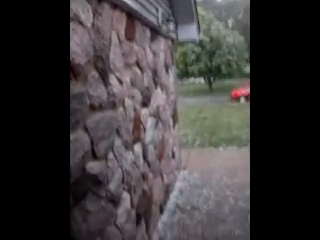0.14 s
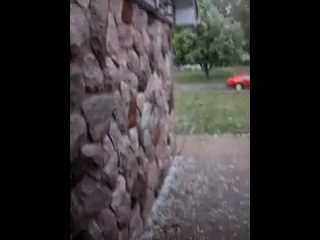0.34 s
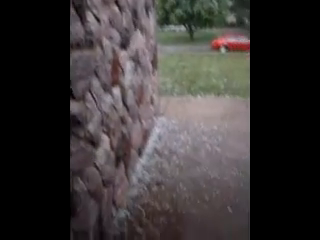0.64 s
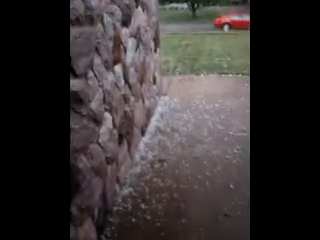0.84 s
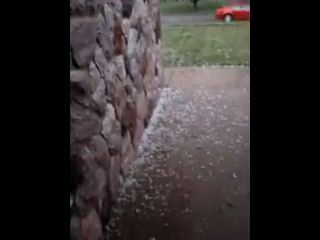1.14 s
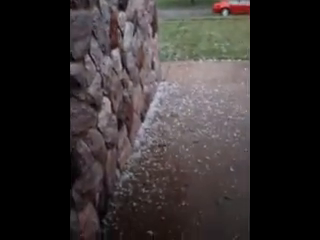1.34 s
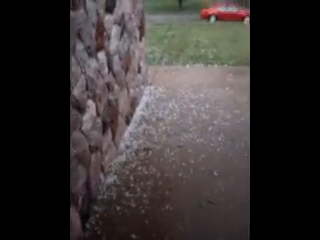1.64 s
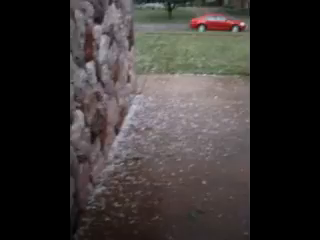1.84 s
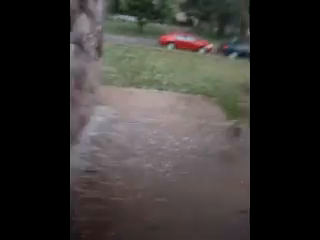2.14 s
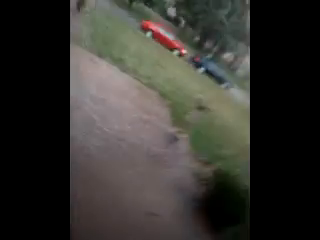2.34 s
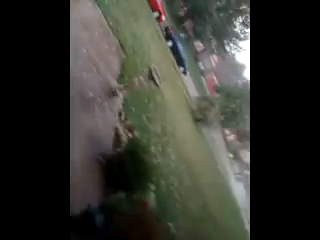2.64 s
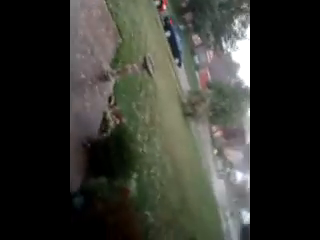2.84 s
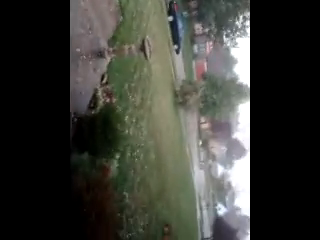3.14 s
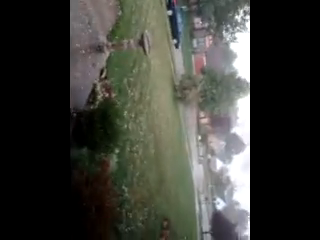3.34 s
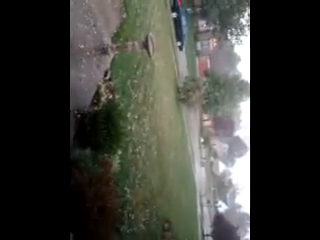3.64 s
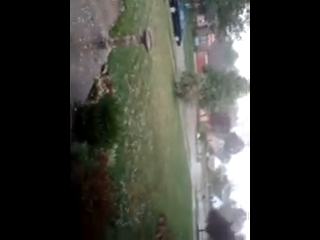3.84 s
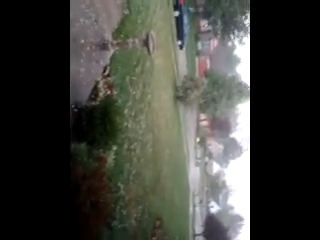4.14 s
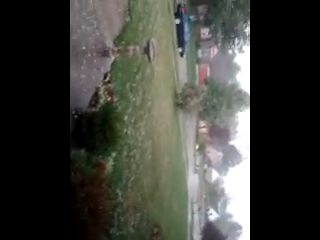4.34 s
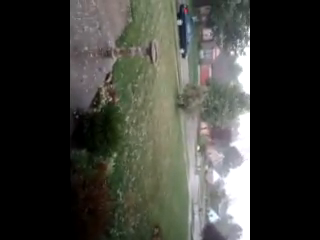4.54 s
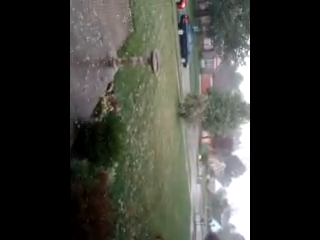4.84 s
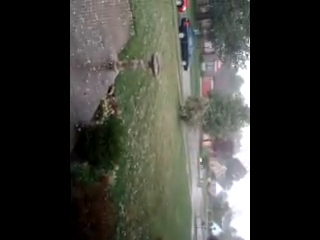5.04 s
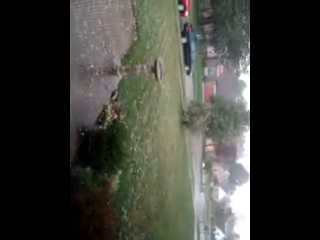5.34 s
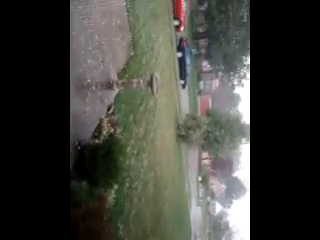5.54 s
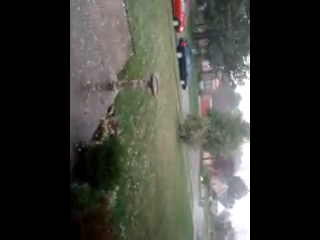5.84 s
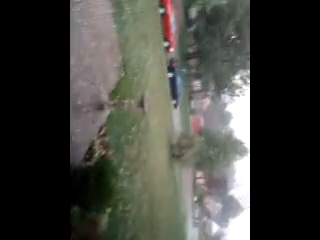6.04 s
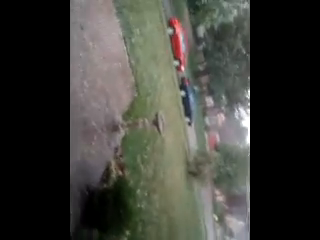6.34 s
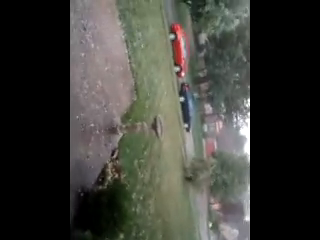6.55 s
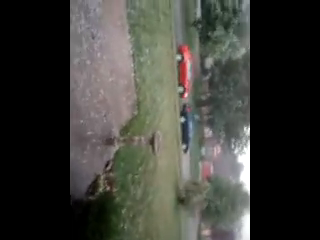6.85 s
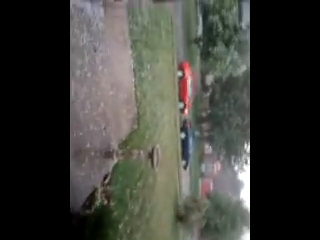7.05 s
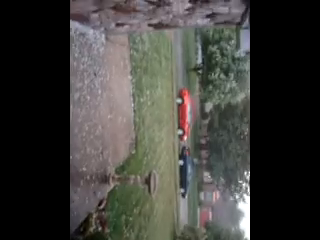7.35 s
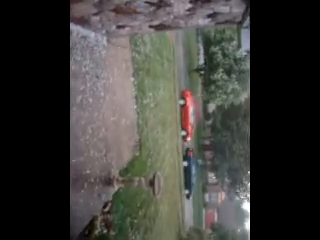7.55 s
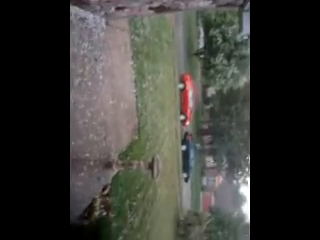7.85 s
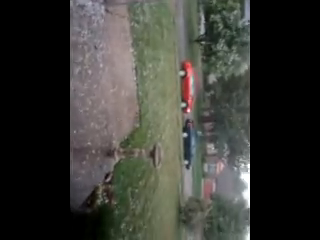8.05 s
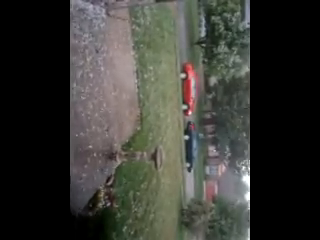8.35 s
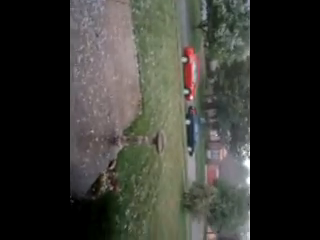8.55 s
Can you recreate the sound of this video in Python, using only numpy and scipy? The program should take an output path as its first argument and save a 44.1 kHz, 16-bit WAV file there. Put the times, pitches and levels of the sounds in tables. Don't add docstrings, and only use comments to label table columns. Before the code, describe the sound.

A hailstorm is already in full fall at 0 seconds and continues unbroken to about 8.7. Countless small stones on the lawn form a grainy patter and hiss, gently swelling and easing. Close to the microphone, large stones hit paving: sharp ticks at 0.2 to 0.5, with cracks and splintery scatter. Around 1.0 to 1.6 come hollow board thuds and brief gutter pings. A soft deep roof boom falls near 2.7, a ping near 2.9, then a cluster of knocks at 3.4 to 3.7. Bright metallic clinks and a strong knock arrive at 5.05 to 5.4, and a heavy woody blow with a roof boom at 5.8. Another thud lands at 6.8; dense cracks and clinks crowd 7.0 to 7.6, then hard hits at 8.0 and 8.5. Short porch reflections surround the blows. The phone sound is thin, band-limited and patchy in the treble.

```python
import sys
import numpy as np
from scipy import signal
from scipy.fft import rfft, irfft
from scipy.io import wavfile
from scipy.ndimage import uniform_filter1d

SR = 44100
rng = np.random.default_rng(int(sys.argv[2]) if len(sys.argv) > 2 else 0)


def int16_out(signal):
    q = np.round(np.clip(np.atleast_2d(signal).T, -1, 1) * 32767)
    wavfile.write(sys.argv[1], SR, q.astype(np.int16))


def volts(x):
    e = np.asarray(x, float) / 20
    return 10 ** e


N = 384111
RING_LEN = 8192
TREBLE_TOP_HZ = 10190

# start_s, level_db, large_stones_db (re level)
STORM = [(0.0, -34, 0.5), (0.72, -39.5, 1), (1.45, -33.5, 1), (2.21, -35, 0.5), (2.86, -35.5, 3.5),
         (3.39, -35, 1.5), (3.62, -33, 2.5), (3.98, -37.5, 3), (4.19, -34, 1), (4.75, -35.5, 6.5),
         (4.9, -32, 3.5), (5.41, -33, 1), (5.82, -36, 1.5), (6.9, -34.5, 1), (7.16, -32.5, 4),
         (7.7, -36.5, -0.5), (8.01, -34.5, 3), (8.71, -32.5, 1)]
# freq_hz, density_db (per Hz)
FAR_COLOUR = [(24, -52), (40, -37.5), (192, -19), (313, -6.5), (367, -7), (570, -1), (970, 1.5), (1730, 0),
              (2500, 1), (7940, -6), (10000, -9.5), (13000, -38), (22000, -120)]
# start_s, peak_db
TICKS = [(0.2305, -11.5), (0.3462, -6.5), (0.4472, -14.8), (0.8727, -10), (0.9599, -13.4), (1.3747, -15.8),
         (1.9137, -16.1), (2.1432, -12.5), (2.451, -15.2), (2.6544, -16), (2.9716, -16), (3.199, -13.4),
         (3.4905, -12.4), (3.5862, -13.5), (4.1292, -15.3), (4.5302, -12.5), (4.7353, -19), (4.9484, -19),
         (5.0649, -8.3), (5.1934, -14.3), (5.2049, -14.3), (5.2541, -12.1), (5.3586, -10.4), (5.7763, -6),
         (6.2218, -11.8), (6.7927, -11), (7.2895, -10), (7.8893, -13.3), (8.0043, -8.3), (8.5279, -9.8),
         (0.078, -21), (0.141, -20), (0.4089, -15.7), (1.2998, -16.6), (1.6444, -17), (1.7807, -12.3),
           (1.8139, -17.2), (1.8743, -18), (2.8393, -13.5), (3.0367, -17), (3.3529, -14.5), (3.6852, -15.6),
           (3.9439, -11.5), (4.4384, -16.5), (4.47, -14.3), (5.1613, -15), (5.7515, -15.7), (5.9543, -18.3),
           (6.0765, -16), (6.0866, -14.7), (6.4427, -16.9), (6.6527, -15), (6.9726, -16), (7.231, -12.5),
           (7.4814, -14.7), (7.8074, -13.9), (8.0124, -14.1), (8.0831, -16.8), (8.246, -12.5),
           (8.4061, -16.3)]
# start_s, peak_db
MORE_TICKS = [(0.4604, -15.8), (0.4725, -17.6), (0.5226, -17.1), (0.8595, -20.0), (1.2882, -18.9),
              (1.4577, -17.8), (1.992, -18.2), (2.0629, -20.2), (2.4272, -19.5), (2.4566, -16.0), (2.4687, -17.4),
              (2.5739, -20.6), (2.9277, -15.7), (3.0313, -19.6), (3.0418, -19.0), (3.4288, -18.4),
              (3.4644, -12.7), (3.5172, -17.1), (3.5777, -17.0), (3.7334, -19.0), (4.4886, -17.9),
              (4.5417, -17.4), (4.8285, -17.8), (4.9737, -19.1), (5.1464, -19.3), (5.3088, -19.2),
              (5.6011, -17.2), (5.6451, -17.6), (5.672, -17.0), (6.0579, -20.4), (6.1574, -20.9), (6.7656, -13.3),
              (6.9709, -15.9), (7.002, -18.7), (7.0397, -18.0), (7.1237, -18.3), (7.141, -17.8), (7.1776, -17.9),
              (7.3575, -18.7), (7.5548, -15.9), (7.5626, -17.5), (8.1294, -20.5), (8.3471, -19.7), (8.431, -17.7),
              (8.5947, -16.4), (0.1092, -19), (0.3544, -17), (1.354, -21), (3.2506, -20), (4.3477, -18),
              (5.6855, -19), (6.5485, -21), (7.0672, -18), (7.1563, -18), (1.568, -16), (1.3855, -13),
              (5.6095, -17), (8.4055, -18), (8.651, -20)]
# start_s, peak_db, ring_hz, scatter_t60_s
SHATTERS = [(0.111, -24, 1810, 0.16), (0.408, -23, 5000, 0.081), (0.6915, -24.5, 2490, 0.33),
            (0.859, -24, 2640, 0.1), (1.241, -27, 2520, 0.21), (1.289, -25.5, 1420, 0.16),
            (1.781, -23, 2420, 0.058), (1.873, -25.5, 2700, 0.12), (1.991, -24.5, 3760, 0.049),
            (2.037, -23.5, 5200, 0.051), (2.47, -19.5, 1500, 0.12), (2.8403, -25.5, 1560, 0.2),
            (3.2925, -22.5, 2000, 0.16), (3.351, -24, 4350, 0.083), (3.895, -20, 2230, 0.29),
            (3.943, -19, 1320, 0.18), (4.469, -23, 5560, 0.14), (4.813, -21, 2140, 0.17),
            (5.669, -28, 2570, 0.23), (6.084, -28, 1480, 0.13), (6.5504, -27, 2250, 0.19),
            (6.968, -21, 4400, 0.16), (7.1227, -20.5, 2520, 0.16), (7.23, -18, 1950, 0.087),
            (7.482, -20, 2000, 0.16), (7.5489, -20.5, 5500, 0.13), (7.7105, -18, 2050, 0.032),
            (7.807, -22, 1410, 0.036), (8.242, -19, 4430, 0.025), (8.427, -18, 2400, 0.034)]
# start_s, peak_db, ring_hz, scatter_t60_s
CHIPS = [(0.2298, -16, 3000, 0.095), (0.445, -18.5, 2930, 0.28), (0.511, -17, 1820, 0.1),
         (0.8725, -21, 2980, 0.12), (1.0227, -29, 3200, 0.1), (1.378, -19.5, 3930, 0.1),
         (1.555, -22, 1690, 0.23), (1.9125, -22.5, 2060, 0.18), (2.1417, -20.5, 1870, 0.11),
         (2.4498, -17, 2480, 0.12), (2.6539, -16.5, 2760, 0.19), (2.9726, -20, 2160, 0.17),
         (3.249, -23.5, 2120, 0.098), (3.463, -16.5, 2100, 0.23), (3.7325, -22.5, 1980, 0.17),
         (4.098, -28, 3080, .16), (4.126, -21.5, 2980, 0.14), (4.6752, -20.5, 2190, 0.34),
         (4.7352, -22, 2600, 0.2), (5.1382, -22, 2600, 0.21), (5.602, -23.5, 2000, 0.51),
         (5.6846, -23, 2260, 0.24), (5.726, -19, 2040, 0.3), (5.7768, -16.5, 2500, 0.21),
         (6.2197, -21.5, 2600, 0.17), (6.363, -23.5, 3980, 0.14), (6.65, -24.5, 2050, 0.34),
         (7.0235, -22.5, 2290, 0.4), (7.861, -20, 2300, 0.15), (8.4835, -20.5, 4400, 0.1)]
# start_s, peak_db, ring_hz, scatter_t60_s
BOUNCES = [(0.35, -19, 1860, 0.23), (0.9366, -23, 2900, 0.078), (0.9532, -24, 2870, 0.34),
           (1.402, -18.5, 1850, 0.12), (1.6432, -25.5, 2090, 0.13), (1.8143, -26, 2670, 0.11),
           (2.9258, -23.5, 1750, 0.18), (3.0336, -20, 1520, 0.1), (3.0844, -21.5, 1890, 0.19),
           (3.197, -26, 1840, 0.15), (3.4896, -17.5, 2020, 0.22), (3.5688, -21.5, 3200, 0.083),
           (3.5848, -18.5, 2110, 0.056), (4.4388, -24.5, 2110, 0.14), (4.5294, -19, 1790, 0.11),
           (4.8863, -21, 2100, 0.093), (5.061, -17.5, 2340, 0.079), (5.2535, -21.5, 2180, 0.28),
           (5.3585, -13, 1026, 0.12), (6.183, -27, 2550, 0.056), (6.764, -23, 1940, 0.18),
           (6.7764, -19, 2060, 0.049), (7.174, -18, 2010, 0.038), (7.204, -18, 2360, 0.066),
           (7.2891, -17, 3360, 0.12), (7.3557, -24, 2200, 0.032), (7.889, -19.5, 2100, 0.14),
           (8.011, -19, 2240, 0.086), (8.1686, -18.5, 1770, 0.2), (8.527, -15, 2400, 0.29)]
# start_s, peak_db, ring_hz, t60_s
NOTES = [(0.231, -25.5, 4650, 0.057), (0.5123, -28.0, 1620, 0.089), (0.8715, -29.1, 1950, 0.06),
         (1.0222, -22, 1080, 0.06), (1.3075, -28, 1660, 0.074), (1.3838, -20, 3950, 0.045),
         (1.4592, -23, 2300, 0.058), (2.1416, -22, 1860, 0.061), (2.423, -28, 4070, 0.1),
         (2.4669, -24, 2430, 0.06), (3.1484, -29, 1860, 0.078), (3.1985, -22, 2060, 0.055),
         (3.4626, -27, 2720, 0.072), (3.4946, -26, 4760, 0.12), (3.4896, -27, 2700, 0.132),
         (3.9146, -28, 2020, 0.12), (4.4354, -30.4, 2430, 0.096), (4.4953, -25, 1180, 0.1),
         (4.8186, -28, 1910, 0.216), (4.8875, -17, 3950, 0.025), (4.8885, -19.5, 2072, 0.13),
         (5.0241, -29, 1420, 0.071), (5.06, -22, 710, 0.06), (5.3503, -27, 1417, 0.091),
         (5.3633, -26.5, 1860, 0.108), (5.5988, -24, 2280, 0.14), (5.61, -26, 2780, 0.054),
         (5.6686, -27, 2550, 0.061), (5.7524, -25, 2660, 0.064), (5.7564, -22.1, 1400, 0.057),
         (5.7744, -24, 2400, 0.14), (5.79, -18, 1074, 0.07), (6.0767, -26, 2540, 0.096),
         (6.0877, -28, 1010, 0.12), (6.2212, -16.5, 2410, 0.037), (6.4508, -29, 1450, 0.072),
         (6.7651, -15, 1095, 0.077), (6.7881, -21, 2110, 0.05), (6.8559, -24, 2450, 0.076),
         (7.0275, -25, 2780, 0.11), (7.0694, -29, 1205, 0.12), (7.2291, -18.5, 810, 0.074),
         (7.251, -29, 914, 0.15), (7.2909, -11, 3690, 0.057), (7.3548, -26, 2290, 0.06),
         (7.5533, -22, 2925, 0.064), (7.9764, -28, 880, 0.11), (8.022, -22, 1100, 0.04),
         (8.5261, -16.5, 2640, 0.052), (8.5361, -23.9, 1440, 0.065),
         (.231, -31, 2320, 0.06), (0.458, -21, 2750, 0.055), (.8725, -24.5, 2980, .05),
          (.956, -22, 2940, .05), (1.022, -23, 622, 0.14), (1.404, -41.5, 200, 0.51),
          (1.578, -25, 1920, 0.07), (2.845, -30.5, 1044, 0.2), (2.9282, -21, 1750, 0.061),
          (3.085, -31, 3620, 0.036), (5.803, -16, 567, 0.035), (5.9, -28, 1340, 0.078),
          (6.971, -21, 1188, 0.12), (7.068, -38, 804, 0.17), (7.289, -23, 5360, 0.057),
          (7.806, -23, 950, 0.033), (8.011, -20, 4360, 0.056), (.522, -22, 1100, 0.044),
          (4.476, -23, 1092, .1), (6.09, -22.5, 1190, .06)]
# start_s, peak_db, ring_hz
NARROW_BOARDS = [(0.515, -22, 1144), (0.69, -26, 1340), (0.954, -22.5, 1010), (1.285, -22, 630),
                 (1.308, -23, 910), (1.458, -25, 1360), (1.902, -21.5, 1140), (1.988, -23.5, 1080),
                 (3.407, -31, 1060), (3.492, -19.5, 1220), (3.647, -18, 944), (4.473, -19.5, 1066),
                 (4.529, -15.5, 1000), (4.743, -34, 1270), (4.928, -22, 1350), (5.061, -16.5, 1040),
                 (5.755, -18, 1300), (5.7763, -10.5, 904), (5.898, -37, 1280), (6.076, -21, 1140),
                 (6.372, -19.5, 1190), (6.763, -10.5, 1136), (6.853, -22, 1330), (6.972, -30, 1140),
                 (7.361, -28, 1180), (7.457, -26.5, 1060), (7.521, -23, 1150), (7.579, -27, 1090),
                 (7.804, -31, 1080), (8.271, -37, 1140)]
# start_s, peak_db, ring_hz, t60_s
HOLLOW_BOARDS = [(0.24, -28.5, 760, 0.22), (0.356, -25, 850, .17), (0.452, -25.5, 590, 0.28),
                 (1.021, -18, 610, 0.18), (1.374, -18.5, 640, 0.27), (1.436, -31, 513, 0.1),
                 (1.542, -20.5, 924, 0.29), (2.139, -20, 623, 0.21), (2.469, -24, 855, .15),
                 (2.654, -23.5, 880, 0.56), (2.839, -20, 836, 0.14), (2.973, -24.5, 845, 0.27),
                 (3.199, -18, 510, 0.063), (3.905, -21, 697, 0.33), (4.348, -24.5, 706, 0.68),
                 (4.816, -22, 630, 0.4), (5.16, -22.5, 605, 0.22), (5.358, -17.5, 576, 0.14),
                 (5.601, -15, 620, 0.4), (6.652, -20, 626, 0.23), (7.2296, -13, 837, 0.021),
                 (7.867, -17.5, 640, 0.53), (8.167, -25, 855, 0.17), (8.527, -14.5, 750, 0.12)]
# start_s, peak_db, ring_hz
BOOMS = [(1.018, -31.5, 336), (1.396, -27.5, 336), (2.442, -46, 363), (3.455, -37, 370), (3.778, -41, 350),
         (5.347, -33, 387), (5.774, -21, 418), (5.864, -39, 342), (6.766, -27, 354), (6.997, -37, 367),
         (7.904, -51, 339), (8.524, -27, 350),
         (1.412, -39.5, 205),
    (2.728, -38, 247),
    (3.799, -51, 258),
    (7.601, -46, 250),
]
# start_s, peak_db, ring_hz
PINGS = [(1.384, -8, 3990), (2.141, -9, 2620), (2.6545, -25, 2850), (2.921, -6, 3030), (3.198, -9, 2000),
         (3.6192, -9, 3540), (4.8873, -17, 2120), (5.062, -2.5, 2500), (5.33, -6.5, 4020),
         (5.3575, -7, 2680), (6.546, -6.5, 2130), (6.9692, -10, 1180), (7.288, -12, 3760),
         (7.2885, -15, 5340), (7.3555, -18, 2120), (1.241, -11.5, 2470), (1.556, -6, 1630)]
# centre_s, lost_share (0-1)
TREBLE_LOSSES = [(0.22, .45), (0.334, .78), (1.273, .7), (2.641, .9), (2.96, .85), (4.084, .55),
                 (4.664, .55), (5.05, .8), (5.122, .9), (5.555, .45), (6.11, .7), (6.165, .45),
                 (6.208, .95), (6.957, .95), (8.329, .55), (.985, .7), (2.254, .65), (7.853, .6)]
HALF_LOSSES = [.39, .441, .535, .63, .779, .814, 1.078, 1.232, 1.393, 1.52, 1.536, 1.698, 1.797, 2.021,
               2.127, 2.192, 2.351, 2.696, 2.826, 3.11, 3.171, 3.99, 4.232, 4.429, 4.867, 4.936, 5.86,
               5.915, 6.437, 7.213, 7.544, 7.707, 8.077, 8.096, 8.114, 8.155, 8.4, 8.45, 8.64]
SPILLS = [.234, .349, .705, .874, 1.377, 1.782, 2.046, 2.145, 2.274, 2.449, 2.625, 2.67, 2.978, 3.298,
          3.329, 3.354, 3.905, 3.949, 4.116, 4.487, 4.836, 4.95, 5.064, 5.145, 5.364, 5.786, 6.055, 6.223,
          6.972, 7.233, 7.264, 7.292, 7.483, 7.554, 7.593, 7.722, 7.875, 8.01, 8.07, 8.345]


def unit(x):
    return x / np.sqrt(np.mean(x ** 2))


def band(x, lo_hz, hi_hz, order=2):
    return signal.sosfilt(signal.butter(order, [lo_hz, hi_hz], "band", fs=SR, output="sos"), x)


def highpass(x, hz):
    return signal.sosfilt(signal.butter(1, hz, "high", fs=SR, output="sos"), x)


def resonance(x, hz, sharp):
    return signal.lfilter(*signal.iirpeak(hz, sharp, fs=SR), x)


def add(out, s, sound):
    i = int(s * SR)
    out[i:i + len(sound)] += sound[:len(out) - i]


def scatter(noise, t60, rise, hold, lumpy_db=2.0):
    t = np.arange(RING_LEN) / SR
    fade = volts(-60 * np.maximum(t - hold * t60, 0) / max(t60, 0.02))
    shape = (1 - np.exp(-t / rise)) * fade
    shape *= 1 + 1.2 * np.exp(-t / 0.004)
    lumps = uniform_filter1d(np.repeat(noise[::128], 128), size=64)
    return shape * volts(lumpy_db * lumps) * np.roll(noise, 7)


def patter(per_s, spread_db, t60):
    count = int(per_s * N / SR)
    stones = np.zeros(N)
    places = rng.integers(0, N, 20000)[:count]
    sizes = np.minimum(rng.exponential(size=20000), 3)[:count]
    stones[places] = volts(2.6 * spread_db * sizes)
    power = signal.lfilter([1], [1, -volts(-120 / (t60 * SR))], stones)
    return power / power.mean()


def far_hail():
    s, high_db, weight_db = np.transpose(STORM)
    t, hz = np.arange(N) / SR, np.fft.rfftfreq(N, 1 / SR) + 1
    colour_hz, colour_db = np.transpose(FAR_COLOUR)
    colour = volts(np.interp(np.log(hz), np.log(colour_hz), colour_db))
    shared = patter(500, 2.5, 0.015)
    low, high = np.zeros(N), np.zeros(N)
    for centre_hz in 22 * 2 ** np.arange(0, 9.5, 0.5):
        window = np.cos(np.pi * np.clip(np.log2(hz / centre_hz), -0.5, 0.5))
        power = shared + volts(3.5) * patter(250, 2.44, 0.054) + volts(-8.0)
        hiss = np.sqrt(power) * rng.standard_normal(N)
        part = irfft(rfft(hiss) * window * colour, N)
        if centre_hz < 1400:
            low += part
        else:
            high += part
    low_gain = volts(np.interp(t, s, high_db + weight_db) - 9.0)
    high_gain = volts(np.interp(t, s, high_db))
    return unit(low) * low_gain + unit(high) * high_gain


def pebbles(per_s=120, db=-33.0, spread_db=1.0):
    out, t = np.zeros(N), np.arange(256) / SR
    chance = rng.uniform(size=(3000, 3))[:int(per_s * N / SR)]
    for when, pitch, size in chance:
        hz = 1200 * 5 ** pitch
        gain = volts(db - spread_db * np.log(size + 0.021))
        click = np.sin(2 * np.pi * hz * t) * np.exp(-t * hz / 0.62)
        add(out, when * N / SR, gain * click)
    return out


def ticks(contacts):
    out, t = np.zeros(N), np.arange(-64, 64) / SR
    chance = rng.uniform(size=(len(contacts), 2))
    for (s, db), (hard, swing) in zip(contacts, chance):
        u = t * (14000 + 6000 * hard)
        spike = -np.exp(-u ** 2)
        spike += (0.1 + 0.4 * swing) * np.exp(-(u - 2) ** 2)
        spike += 0.2 * np.exp(-((u - 4) / 3) ** 2)
        add(out, s + t[0], volts(db + 2) * spike)
    return band(out, 560, 11000, order=1)


def cracks():
    out, t = np.zeros(N), np.arange(RING_LEN) / SR
    kinds = ((SHATTERS, -3, 0.002), (CHIPS, -10, 0.0004), (BOUNCES, -32, 0.0004))
    for stones, splinter_db, onset in kinds:
        chance = rng.standard_normal((len(stones), RING_LEN))
        for (s, db, hz, t60), noise in zip(stones, chance):
            echo = scatter(noise, t60, onset, 0.15)
            ring = volts(-8.0) * resonance(echo, hz, 2.26)
            ring += volts(-5.0) * resonance(echo, hz, 44.0)
            ring += volts(-9.5) * band(echo, 1560, 6080)
            knock = -volts(-10) * np.sin(2 * np.pi * hz * t) * np.exp(-t * hz / 3.8)
            splinters = volts(splinter_db - 7.0) * band(echo, 3250, 10300)
            add(out, s, volts(db) * (knock + ring + splinters))
    return out


def notes(rough=0.64):
    out, t = np.zeros(N), np.arange(2 * RING_LEN) / SR
    rows = NOTES
    for (s, db, hz, t60), chance in zip(rows, rng.standard_normal((len(rows), RING_LEN))):
        second_hz = hz * (1 + 0.0696 * chance[0])
        pair = np.sin(2 * np.pi * hz * t) + 0.56 * np.sin(2 * np.pi * second_hz * t)
        grain = 1 + rough * np.tanh(np.interp(t * hz / 2, np.arange(RING_LEN), chance))
        envelope = volts(db - 3.0 - 60 * t / t60) * (1 - np.exp(-t / 0.00093))
        add(out, s, envelope * grain * pair)
    return out


def thuds():
    out, t = np.zeros(N), np.arange(RING_LEN) / SR
    boards = [(*row, 0.2) for row in NARROW_BOARDS] + HOLLOW_BOARDS
    chance = rng.standard_normal((len(boards), RING_LEN))
    for (s, db, hz, t60), noise in zip(boards, chance):
        knock = -np.sin(2 * np.pi * hz * t) * np.exp(-t / 0.011) * volts(-9.5)
        echo = scatter(noise, t60, 0.001, 0.11)
        ring = volts(-3.0) * resonance(echo, hz, 6.1)
        ring += volts(-11.0) * resonance(echo, hz, 45.0)
        ring += volts(-6.0) * band(echo, 457, 2190)
        add(out, s, volts(db) * (knock + ring))
    return band(out, 270, 12000)


def booms():
    out = np.zeros(N)
    rows = BOOMS
    chance = rng.standard_normal((len(rows), RING_LEN))
    for (s, db, hz), noise in zip(rows, chance):
        echo = scatter(noise, 0.31, 0.0019, 0.029)
        drum = resonance(resonance(echo, hz, 2.9), hz, 2.9)
        add(out, s, volts(db + 11.0) * drum)
    return out


def pings():
    out, t = np.zeros(N), np.arange(RING_LEN) / SR
    chance = rng.standard_normal((len(PINGS), RING_LEN))
    for (s, db, hz), noise in zip(PINGS, chance):
        clink = volts(-23) * np.sin(2 * np.pi * hz * t) * np.exp(-t / 0.0016)
        echo = scatter(noise, 0.11, 0.00079, 0.053)
        song = volts(-6.5) * resonance(resonance(echo, hz, 5.7), hz, 5.7)
        add(out, s, volts(db) * (clink + song))
    return out


def scene():
    near = ticks(TICKS) + cracks() + thuds() + booms()
    return (near + far_hail() + pebbles() + pings() + notes() + ticks(MORE_TICKS))[None]


def treble_dropouts(x, always=0.2, span_s=0.011):
    hz, t, z = signal.stft(x, SR, nperseg=384, noverlap=192)
    losses = [(row[0] - 0.012, 0.3) for row in SHATTERS + CHIPS]
    losses += [(s, 0.5) for s in HALF_LOSSES]
    losses += TREBLE_LOSSES
    share = np.full(len(t), always)
    for s, lost in losses:
        share[np.abs(t - s) < span_s] = 1.3 * lost
    edges = np.searchsorted(hz, np.geomspace(2600, 10400, 23))
    luck = rng.uniform(size=(len(edges), len(t) // 2 + 1)).repeat(2, axis=1)[:, :len(t)]
    share *= np.where(share == always, 2.5 * luck[-1] ** 2 + 0.12, 1)
    for k, (a, b) in enumerate(zip(edges[:-1], edges[1:])):
        reach = np.clip(np.log2(hz[a] / 3000), 0.05, 1.0)
        spared = np.where(hz[a] < 4600, share, 1)
        lost = luck[k] < share * reach * spared
        z[a:b] *= np.where(lost, volts(-19 - 18 * share), 1)
    return signal.istft(z, SR, nperseg=384, noverlap=192)[1][:N]


def spill(length_s=0.039, db=-81.5, bass_db=-74.0):
    out, puff = np.zeros(N), np.hanning(int(length_s * SR)) ** 0.5
    lows = rng.uniform(size=len(SPILLS))
    noises = rng.standard_normal((len(SPILLS), len(puff)))
    for s, low, noise in zip(SPILLS, lows, noises):
        patch = unit(band(noise, 10700 + 2500 * low ** 2, 15600, order=6))
        bass = puff * unit(band(noise, 25, 110))
        add(out, s - length_s / 2, puff * (volts(db + 2 * noise[0]) * patch + volts(bass_db) * bass))
    return out


def top_cut(x):
    return signal.sosfilt(signal.butter(12, 15800, fs=SR, output="sos"), x)


def record(dry):
    x = treble_dropouts(highpass(dry[0], 150))
    x = 0.7 * np.tanh(x / 0.7)
    spectrum, hz = rfft(x), np.fft.rfftfreq(N, 1 / SR)
    edge_db = np.interp(hz, [TREBLE_TOP_HZ - 250, TREBLE_TOP_HZ + 150, TREBLE_TOP_HZ + 500], [0, -46, -90])
    mirror_db = np.interp(hz, [10300, 13800, 14400, 15700, 15800], [-56, -60, -48.5, -49, -85.5])
    mirror = spectrum[::-1].conj() * volts(mirror_db) * (hz > TREBLE_TOP_HZ)
    x = irfft(spectrum * volts(edge_db) + mirror, N)
    return top_cut((x + spill())[None])


dry = scene()
out = record(dry)
int16_out(out)
```